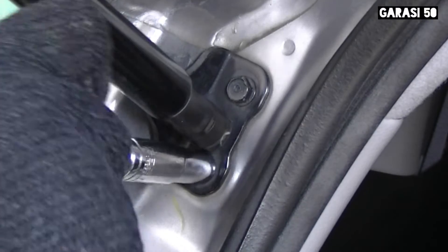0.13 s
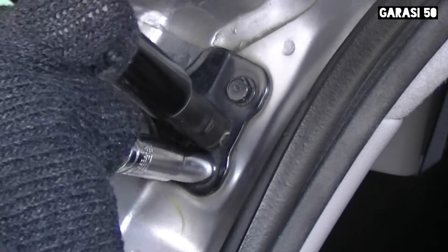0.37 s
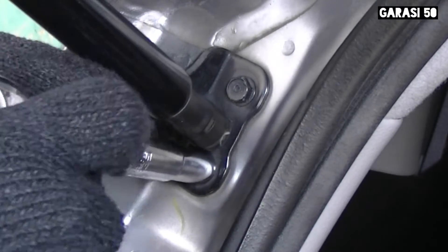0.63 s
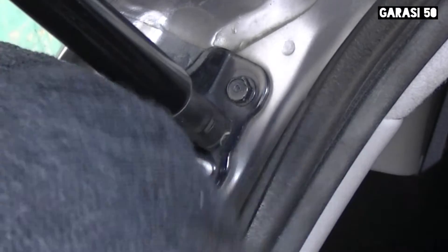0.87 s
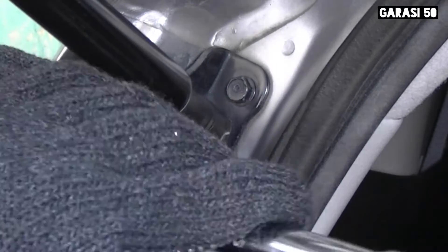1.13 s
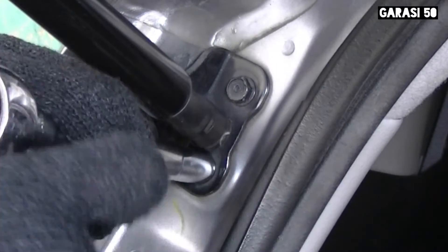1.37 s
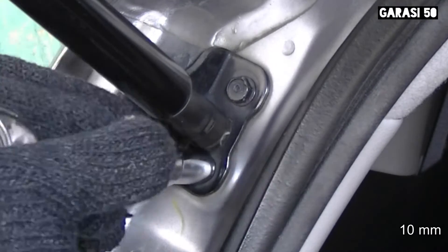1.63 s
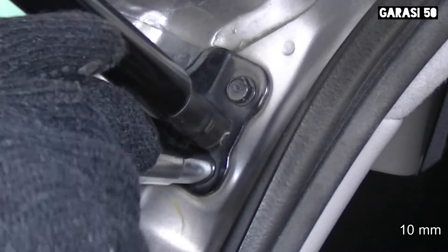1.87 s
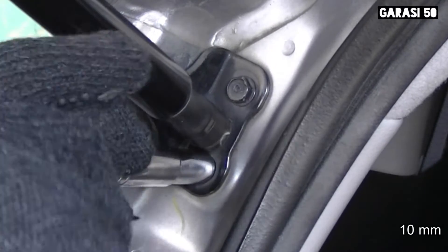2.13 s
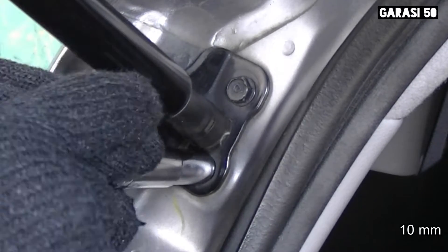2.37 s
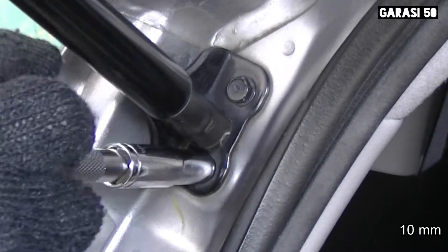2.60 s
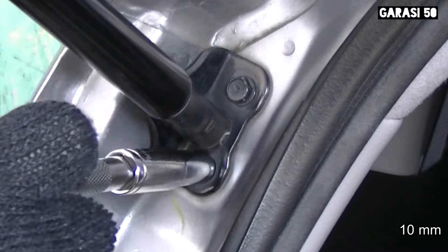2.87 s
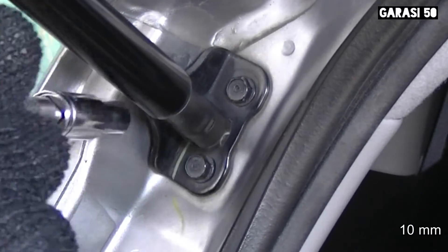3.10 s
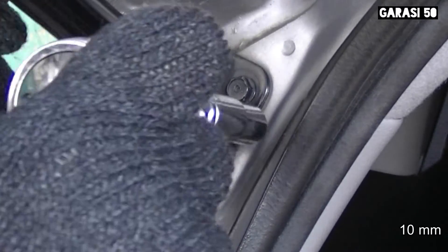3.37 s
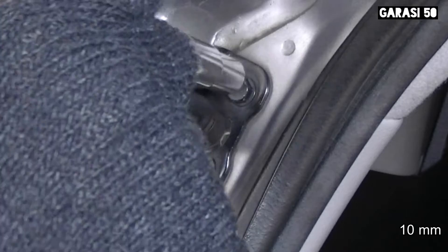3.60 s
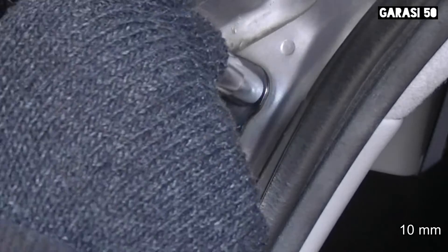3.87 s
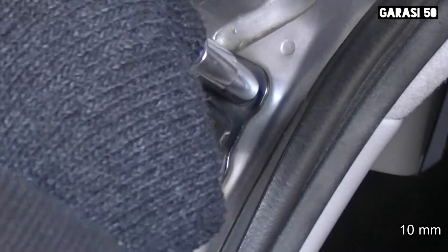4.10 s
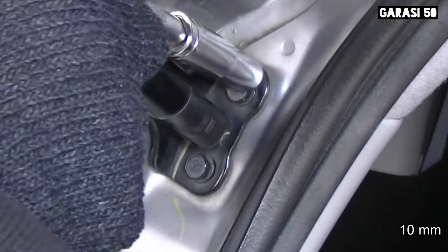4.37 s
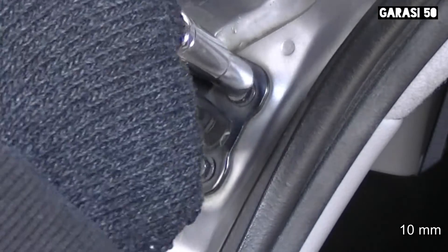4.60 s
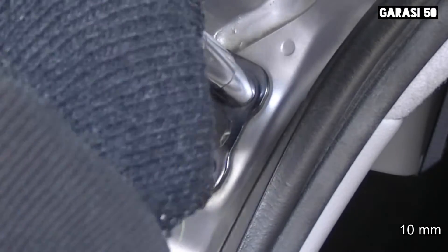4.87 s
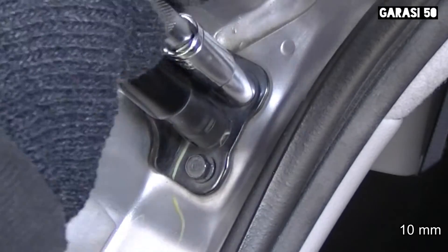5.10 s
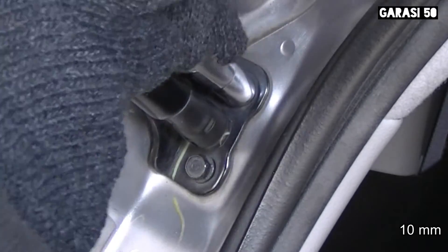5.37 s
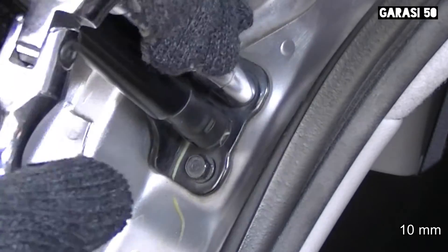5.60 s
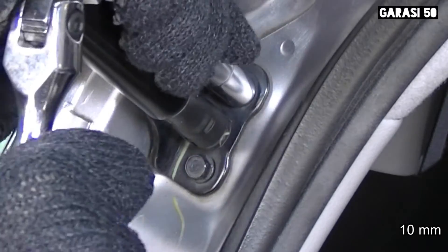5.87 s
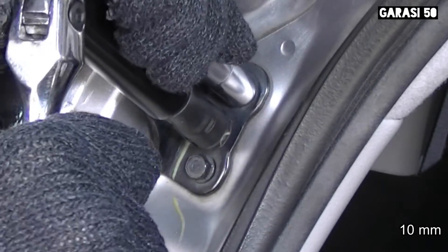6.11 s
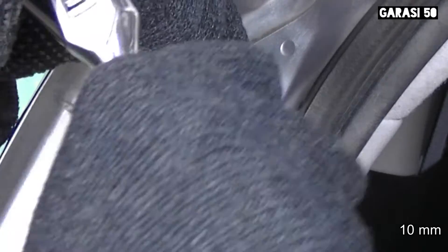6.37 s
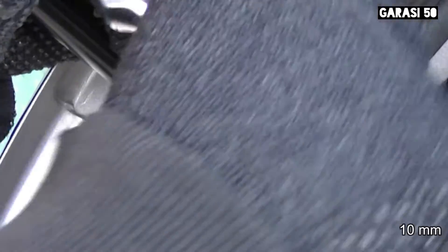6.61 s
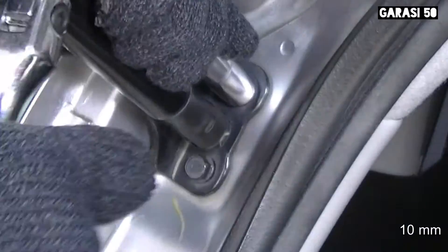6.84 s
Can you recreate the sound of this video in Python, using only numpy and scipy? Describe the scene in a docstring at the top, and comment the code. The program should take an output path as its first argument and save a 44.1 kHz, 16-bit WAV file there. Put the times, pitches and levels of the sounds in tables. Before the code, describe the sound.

Close stereo microphone in an open garage. A hand ratchet gives four quick bursts of bright, dry clicks about a third of a second apart, with small knocks between. Then the socket is moved, clanking hard on the ringing sheet metal of a tailgate, with dull hand bumps. Scattered clicks follow, a lull filled by a rushing background, and one final ratchet burst.

```python
"""Open garage, a stereo microphone close to a car's sheet-metal tailgate.
A hand ratchet with a socket works on bolts: on each back swing the pawl snaps over the teeth and rings the head.
Socket and handle knock and ring the panel; hands bump it; a faint narrow ringing comes and goes.
Blows are short rough contacts driving decaying modes; tailgate and garage answer with a diffuse noise tail.
Behind lie a rush and a low drone, probably traffic: bands of flickering noise that dip and recover."""
import sys
import numpy as np
from scipy import signal
from scipy.io import wavfile

SR = 44100
rng = np.random.default_rng(int(sys.argv[2]) if len(sys.argv) > 2 else 0)


def file_out(sig):
    """Save sig as 16-bit WAV at sys.argv[1]."""
    # one column per channel
    cols = np.atleast_2d(sig).T
    # limit, then scale
    lim = np.clip(cols, -1, 1)
    pcm = np.round(lim * 32767).astype(np.int16)
    wavfile.write(sys.argv[1], SR, pcm)


def ratio(d):
    """dB to gain"""
    e = np.asarray(d, float) / 20
    return 10 ** e


N = 307818   # samples, about 7 s
CONTROL_STEP = 40   # samples between values of a slow curve


def rms_one(x):
    """Scales to rms 1."""
    return x / np.sqrt(np.mean(x ** 2) + 1e-20)


def at_hz(points, hz):
    """Reads a table on a log-frequency axis."""
    f, value = np.array(points).T
    return np.interp(np.log(hz), np.log(f), value)


def in_time(rows):
    """Curve columns at every sample, the first column being t/s."""
    s, *columns = np.transpose(rows)
    return [np.interp(np.arange(N) / SR, s, column) for column in columns]


def band(x, low_hz, high_hz):
    """Second-order band-pass."""
    return signal.sosfilt(signal.butter(2, [low_hz, high_hz], "band", fs=SR, output="sos"), x)


def cut(x, hz, kind):
    """Steep high- or low-pass."""
    return signal.sosfilt(signal.butter(4, hz, kind, fs=SR, output="sos"), x)


def every_sample(slow):
    """Joins the values of a slow curve by straight lines."""
    return np.interp(np.arange(N) / CONTROL_STEP, np.arange(len(slow)), slow)


def drift(rate_hz):
    """Slow chance of spread 1: white noise through two equal one-pole low-passes."""
    r = np.exp(-2 * np.pi * rate_hz * CONTROL_STEP / SR)
    settle = 2000   # values dropped while the filter settles
    white = rng.standard_normal(N // CONTROL_STEP + 2 + settle)
    return rms_one(signal.lfilter([1], [1, -2 * r, r * r], white)[settle:])


def humps(s, top_db, rise_db_per_s, fall_db_per_s):
    """Gain of events that climb to their top and fall away at steady rates; the loudest one counts."""
    t = np.arange(0, N + CONTROL_STEP, CONTROL_STEP) / SR - np.array(s)[:, None]
    db = np.array(top_db)[:, None] + np.minimum(rise_db_per_s * t, -fall_db_per_s * t)
    return every_sample(ratio(db.max(axis=0)))


def contact(length_s, rise_s, alike, snap, size):
    """A contact per event: one clean snap, then rough chatter that rises and dies, partly its own at each mic."""
    t = np.arange(size) / SR
    shape = (1 - np.exp(-t / rise_s)) * np.exp(-t / length_s[:, None])
    mid, side = rng.standard_normal((2, len(length_s), size))
    opposite = side * [[[1]], [[-1]]]   # axes: microphone, event, sample
    chatter = shape * (np.sqrt(1 + alike) * mid + np.sqrt(1 - alike) * opposite)
    chatter = chatter / np.sqrt(np.sum(chatter ** 2, axis=-1, keepdims=True))
    return snap * (t == 0) + chatter


def strike(s, force, level_db, centre_hz, modes, slope_db, lag_cycles=0, pan_db=0):
    """Every event rings all modes, most those near its centre (slope per octave); a lag in cycles delays low modes more."""
    out, steps = np.zeros((2, N)), np.arange(force.shape[-1])
    balance_db = np.array([[.5], [-.5]]) * pan_db   # positive pan is left
    for hz, mode_db, t60 in modes:
        near_db = -slope_db * np.abs(np.log2(hz / centre_hz))
        gain = ratio(level_db + mode_db + near_db + balance_db)
        # chance in the contact colours a blow only mildly
        drive = np.abs(force @ np.exp(-2j * np.pi * hz / SR * steps))
        gain = gain / np.maximum(drive, .3) ** .8
        start = np.round((s + lag_cycles / hz) * SR).astype(int)
        at = np.minimum(start[:, None] + steps, N - 1).ravel()
        push = [np.bincount(at, (g[:, None] * f).ravel(), N) for g, f in zip(gain, force)]
        r, w = ratio(-60 / (t60 * SR)), 2 * np.pi * hz / SR
        out += signal.lfilter([.5, 0, -.5], [1, -2 * r * np.cos(w), r * r], np.add(push, 1e-18))
    return out


# left-right likeness of the background at the microphone pair: f/Hz, likeness (1 same, -1 opposite)
BACKGROUND_LIKENESS = [(60, 0.77), (180, 0.63), (550, 0.79), (1650, 0.18), (4970, -0.98), (15000, 0.046)]


def flickering_noise(spectrum, patchy_db):
    """Near half-octave bands of stereo noise, each with its own level, flicker and likeness; rms 1."""
    low_hz, high_hz = spectrum[0][0], spectrum[-1][0]
    edges = np.geomspace(low_hz, high_hz, round(2.2 * np.log2(high_hz / low_hz)) + 1)
    white = rng.standard_normal((2, 2, N))   # neighbouring bands take different noise
    out, together = 0, drift(11.0)
    for k, (low, high) in enumerate(zip(edges, edges[1:])):
        mid, side = band(white[k % 2], low, high)
        hz = np.sqrt(low * high)
        alike = at_hz(BACKGROUND_LIKENESS, hz)
        flicker_db = patchy_db * (0.46 * together + drift(32.0))
        gain = every_sample(ratio(at_hz(spectrum, hz) + flicker_db))
        pair = np.sqrt(1 + alike) * mid + np.sqrt(1 - alike) * side * [[1], [-1]]
        out = out + gain * pair
    return rms_one(out)


# background rush, probably traffic; it dips around the back swings and recovers:
# t/s, roar level/dB, brightness/dB (hiss over roar)
RUSH = [(0.0, -41.5, 6), (.15, -43.5, 0), (.4, -40, -4.5), (.92, -39, -3), (.98, -45.5, 10.5),
        (1.08, -73, 15), (1.75, -64, 5), (2.05, -69.5, -20), (2.8, -65, -16.5), (3.1, -64, -9.5),
        (3.76, -62, -24), (4.1, -55.5, -31), (4.7, -52.5, -22), (5.2, -51, -0.5), (5.33, -42, -17),
        (5.64, -33.5, -48), (5.8, -32.5, -21.5), (6.3, -35, -11), (6.5, -37, -10.5), (6.66, -35, -4),
        (6.76, -52.5, -2), (6.87, -41, 1.5), (6.98, -31, -7.5)]
# low background drone, probably traffic; it dips and recovers likewise: t/s, level/dB
LOW_DRONE = [(0.0, -40), (.3, -48.5), (.7, -54), (.93, -46), (1.1, -63.5), (2.1, -63.5), (3.3, -78),
             (4.2, -73), (4.65, -80), (5.15, -68), (5.3, -56), (5.72, -48.5), (6.33, -36), (6.5, -42.5),
             (6.65, -45.5), (6.7, -57), (6.78, -69), (6.96, -39)]
# spectral shapes of roar, hiss, rumble and drone: f/Hz, relative level/dB
ROAR_SPECTRUM = [(530, -67), (900, -3.5), (1480, 0.5), (1610, 1.5), (1780, -5.5), (2020, -1.5),
                 (2250, -4.5), (2500, -19), (3500, -46), (4550, -56.5), (7700, -120)]
HISS_SPECTRUM = [(1470, -34), (2500, 9.5), (3060, 1), (4210, -3.5), (8270, -15), (10300, -27.5),
                 (11500, -29.5), (14500, -26), (16000, -38)]
RUMBLE_SPECTRUM = [(15, -67.5), (25, -47.5), (102, -25.5), (193, -15.5), (220, -17), (258, -4.5),
                   (450, -8.5), (580, -24.5), (990, -120)]
DRONE_SPECTRUM = [(240, -38.5), (400, -23), (544, -6), (598, 9), (1000, -21), (1300, -22), (2200, -120)]


def background():
    """A rush of roar and hiss over rumble and drone; swells and bumps add power to the same noise."""
    roar_db, bright_db = in_time(RUSH)
    drone_db, = in_time(LOW_DRONE)
    rumble_db = np.maximum(drone_db - 15.5, -78)   # the rumble never falls below a faint floor
    steady = ratio(np.array([roar_db, roar_db + bright_db, rumble_db, drone_db]))
    brief = np.array([*swells(), *bumps()])   # roar, hiss, rumble, drone
    spectra = [ROAR_SPECTRUM, HISS_SPECTRUM, RUMBLE_SPECTRUM, DRONE_SPECTRUM]
    layers = zip(np.hypot(steady, brief), spectra)
    return sum(gain * flickering_noise(spectrum, patchy_db=1.7) for gain, spectrum in layers)


# hands bumping the panel, close to the microphone: t/s, rumble level/dB, boom level/dB
HAND_BUMPS = [(0.01, -42, -62), (0.741, -61, -39), (.91, -56, -54), (1.22, -60, -47.5), (2.49, -55, -62.5),
              (3.19, -56, -74), (3.87, -70, -65), (4.179, -53, -77), (4.33, -56, -45.5),
              (4.429, -66, -45.5), (4.719, -57, -49), (4.818, -43, -27.5), (4.92, -40, -31.5),
              (6.351, -54, -33), (6.56, -48.5, -48)]


def bumps():
    """Gains of rumble and boom: a hand's bump jumps up and dies in low noise."""
    s, *levels_db = np.transpose(HAND_BUMPS)
    return [humps(s, db, rise_db_per_s=702.5, fall_db_per_s=224.5) for db in levels_db]


# socket and handle on bolt and panel, close: t/s, level/dB, centre f/Hz,
# socket level/dB and crack level/dB (both against the blow)
BLOWS = [(.036, -18, 2020, 7.5, -3), (.734, -17, 970, -13, -19), (.94, -11, 4700, -2.5, -31),
         (1.224, -26, 985, -22, -50), (1.457, -43.5, 1190, -10.5, -19), (1.573, -37, 1100, -13, -15),
         (2.123, -26, 3000, -13, -26), (2.141, -23.5, 2570, -5.5, -37), (2.199, -29.5, 2650, -21, -30),
         (2.215, -33, 1450, -33, -34), (2.418, -28.5, 1440, -50, -20), (2.483, -15.5, 835, -37, -34),
         (2.92, -54.5, 3000, -40, -11), (2.975, -48, 1750, -41, -11), (2.985, -42.5, 1340, -47.5, -32),
         (3.165, -3, 3070, -10.5, -6.5), (3.181, -6.5, 1610, -13.5, -17), (3.273, -28, 1600, -23, -23),
         (3.845, -3.5, 2000, -62, -16.5), (3.856, -15, 1310, -34, -5), (3.985, -18, 1940, -60, -39),
         (4.168, -2.5, 2020, -14, -3.5), (4.238, -44, 1570, -52, -17), (4.259, -20.5, 2110, -35, -13),
         (4.299, -22.5, 2510, -44, -2), (4.329, -40, 710, -33, -6), (4.419, -7.5, 1930, -19, -8),
         (4.474, -13.5, 1800, -19.5, -3), (4.714, -13.5, 770, -25.5, -42), (4.751, -12, 830, -22, -28),
         (4.794, -3.5, 2010, -15, -4), (4.86, -19, 835, -20.5, -14), (4.9, -16.5, 740, -29, -15),
         (4.915, -9, 1960, -29, -13.5), (5.766, -23.5, 1390, -15.5, -28), (6.29, -3.5, 1780, -28, -10.5),
         (6.531, -12.5, 1690, -49, -11), (6.829, -22.5, 2690, -18, -10), (6.885, -19, 1110, -24, -7),
         (6.94, -12.5, 2730, -37.5, -35)]
# panel and bracket modes: f/Hz, relative level/dB
PANEL_MODES = [(330, -15), (490, -9), (610, -5.5), (727, -2.5), (800, -10.5), (900, -5), (1060, -1.5),
               (1170, -3), (1310, -6), (1440, -4), (1600, -1), (1740, -20), (1940, -1.5), (2120, 2),
               (2260, 0.5), (2400, -7), (2670, -0.5), (2830, -0.5), (3020, -11.5), (3180, 1), (3450, -5.5),
               (3850, -9), (4300, -18.5)]
# socket modes: f/Hz, relative level/dB, t60/s
SOCKET_MODES = [(4900, -4, 0.00067), (5920, -5, 0.015), (6940, -9, 0.0088), (8410, -13, 0.0074),
                (9430, 4.5, 0.0035), (12200, -12, 0.0028), (13800, -8.5, .006)]
# the crack of a blow: f/Hz, relative level/dB, t60/s
CRACK_MODES = [(3300, -10, 0.001), (3800, -4, 0.0077)]


def knocks():
    """A blow cracks, sounds the socket at once and spreads into the panel, low modes last."""
    s, level_db, centre_hz, socket_db, crack_db = np.transpose(BLOWS)
    length_s = 0.0046 * (2000 / centre_hz) ** 0.22   # deeper blows touch longer
    force = contact(length_s, rise_s=0.00067, alike=0.36, snap=0.75, size=1600)
    tick = contact(0.6 * length_s, rise_s=0.00016, alike=1.0, snap=0.48, size=800)
    crack = contact(np.full(len(s), 0.0002), rise_s=0.00011, alike=0.44, snap=0.62, size=400)
    modes = [(hz, db, 2.42 / np.sqrt(hz)) for hz, db in PANEL_MODES]   # low modes ring longer
    panel = strike(s, force, level_db - 9.5, centre_hz, modes, slope_db=13.5, lag_cycles=2.9)
    panel += strike(s, crack, level_db + crack_db + 7.0, 3900, CRACK_MODES, slope_db=5.5)
    socket = strike(s, tick, level_db + socket_db, 3700, SOCKET_MODES, slope_db=9.0)
    return cut(cut(panel, 4200, "low"), 7200, "low") + socket


# diffuse tail of tailgate and garage around the microphone: f/Hz, relative level/dB, t60/s
GARAGE_TAIL = [(400, -8.5, 0.56), (1000, -2, 0.24), (2000, -11.5, 0.55), (4000, -10.5, 0.32),
               (8000, -14, 0.32), (12800, -28.5, 0.46)]


def garage(x):
    """So many modes and echoes overlap that each band's energy lingers as noise, unrelated left and right."""
    f, level_db, t60_s = np.transpose(GARAGE_TAIL)
    edges = np.geomspace(300, 16000, 16)
    white = rng.standard_normal((2, 2, N))
    out, mono = 0, x.mean(axis=0)
    fill = np.exp(-1 / (0.0013 * SR))   # the tail builds up over 1.3 ms
    for k, (low, high) in enumerate(zip(edges, edges[1:])):
        hz = np.sqrt(low * high)
        fade = ratio(-120 / (at_hz(np.column_stack([f, t60_s]), hz) * SR))   # of energy, per sample
        power = band(mono, low, high) ** 2 + 1e-18
        energy = signal.lfilter([1 - fill], np.convolve([1, -fade], [1, -fill]), power)
        noise = band(band(white[k % 2], low, high), low, high)
        envelope = np.sqrt(np.abs(energy) * SR / 2 / (high - low))   # evens out the bandwidth
        out = out + ratio(at_hz(np.column_stack([f, level_db]), hz) - 28.5) * envelope * noise
    return out


# single pawl snaps as the handle creeps: t/s, high ring level/dB, low ring level/dB, low ring f/Hz
CREEP_SNAPS = [(.1545, -55, -40.5, 5160), (0.9114, -50, -34.5, 5300), (1.0666, -57.5, -31.5, 4630),
               (1.3798, -54, -39.5, 5500), (1.4576, -55.5, -45, 5280), (1.7006, -35.5, -36.5, 5240),
               (1.7205, -52, -36.5, 5200), (1.7449, -53, -46, 6700), (1.9185, -67, -36, 5500),
               (2.371, -29, -27, 3930), (2.3882, -19, -23, 4400), (2.5205, -19.5, -26.5, 4800),
               (2.628, -39.5, -54, 3100), (3.0614, -75, -59, 6100), (3.133, -70.5, -67.5, 6300),
               (4.948, -17, -22, 4900), (4.9667, -22.5, -18.5, 3400), (4.9975, -27, -19.5, 4400),
               (5.0585, -22.5, -21, 5900), (5.0843, -26.5, -23.5, 4900), (5.1214, -23.5, -22, 6060),
               (6.6407, -45.5, -40.5, 3300), (6.8802, -47, -40, 4100)]
# back swings of the handle, a list each: t/s, teeth passed, high ring level/dB, high ring f/Hz, low ring f/Hz
BACK_SWINGS = [
    [(.9192, 0, -21, 11700, 5600), (.9348, 1, -22, 11300, 5300), (.9562, 5, -18, 10800, 5100),
     (.9969, 13, -24, 12000, 5300), (1.0057, 14, -25, 12000, 5600), (1.0209, 15, -26, 12100, 5300)],
    [(1.2503, 0, -18, 11100, 4500), (1.2624, 2, -20, 11100, 4600), (1.2706, 3, -20, 11000, 6000),
     (1.2916, 7, -21, 11400, 5400), (1.3182, 12, -24, 12000, 6700), (1.3255, 13, -21, 12100, 6900)],
    [(1.5892, 0, -18, 11200, 6200), (1.6133, 4, -19, 11300, 6300), (1.6297, 7, -20, 11200, 6100),
     (1.6588, 13, -23, 11800, 6800)],
    [(1.9378, 0, -21, 10800, 6200), (1.9509, 1, -18, 10800, 5800), (1.9827, 4, -21, 11500, 6600),
     (1.9974, 5, -19, 11600, 6300), (2.0094, 6, -20, 11600, 6400), (2.0288, 8, -24, 11600, 5600)],
    [(6.6626, 0, -19, 11700, 3200), (6.6744, 1, -20, 11700, 3100), (6.7098, 5, -18, 11700, 3200),
     (6.735, 8, -18, 11700, 4400), (6.7566, 10, -24, 11700, 5800), (6.7699, 11, -26, 12000, 5900)],
]
# low ring over each back swing, a row each: level/dB at the first tooth, level/dB at the last
SWING_LOW_RING = [(-23.5, -24), (-22, -24), (-28.5, -24.5), (-23.5, -29.5), (-19, -29)]


def snaps():
    """Rows (s, high dB, high Hz, low dB, low Hz, pan dB) of all pawl snaps; no two teeth of a swing are quite alike."""
    pan_start_db, pan_end_db = 1, 2   # the head moves left as the handle swings
    spread_db, spread_hz = 1.2, 350   # from tooth to tooth
    rows = [(s, high_db, 10850, low_db, low_hz, pan_start_db)
            for s, high_db, low_db, low_hz in CREEP_SNAPS]
    for swing, (first_db, last_db) in zip(BACK_SWINGS, SWING_LOW_RING):
        s, teeth, high_db, high_hz, low_hz = np.transpose(swing)
        tooth = np.arange(teeth[-1] + 1)   # a snap at every whole tooth
        s, high_db, high_hz, low_hz = [np.interp(tooth, teeth, c) for c in (s, high_db, high_hz, low_hz)]
        through = tooth / tooth[-1]
        high_chance, low_chance, hz_chance, pan_chance = rng.standard_normal((4, len(tooth)))
        high_db = high_db + spread_db * high_chance
        low_db = first_db + (last_db - first_db) * through + spread_db * low_chance
        low_hz = low_hz + spread_hz * hz_chance
        pan_db = pan_start_db + (pan_end_db - pan_start_db) * through + pan_chance
        rows += zip(s, high_db, high_hz, low_db, low_hz, pan_db)
    return np.transpose(rows)


# ratchet head modes, high group: f/Hz, relative level/dB, t60/s
HEAD_HIGH_MODES = [(9600, -4, 0.0059), (10900, 0, .013), (11006, -2, 0.015), (11380, -0.5, .012),
                   (11270, -1.5, 0.016), (11640, -0.5, .012), (13400, -9, 0.004), (13100, -14.5, 0.004),
                   (14400, -5, .005)]
# ratchet head modes, low group: f/Hz, relative level/dB, t60/s
HEAD_LOW_MODES = [(2338, -10.5, 0.0027), (2750, 14, 0.0045), (3720, -6.5, 0.0047), (4288, 5, 0.0064),
                  (4930, -7, 0.012), (5500, -1.5, 0.0055), (6580, 7.5, 0.0026), (7545, 3, 0.012),
                  (8500, -0.5, 0.023)]


def ratchet():
    """The pawl lands, bounces once more weakly, and rings the steel head."""
    s, high_db, high_hz, low_db, low_hz, pan_db = snaps()
    force = contact(np.full(len(s), .0008), rise_s=0.0005, alike=0.61, snap=.15, size=400)
    force = force + ratio(-10) * np.roll(force, round(.0039 * SR), axis=-1)   # the bounce, 3.9 ms on
    high = strike(s, force, high_db + 1.0, high_hz, HEAD_HIGH_MODES, slope_db=95, pan_db=pan_db)
    low = strike(s, force, low_db + 0.5, low_hz, HEAD_LOW_MODES, slope_db=15.0, pan_db=pan_db)
    return cut(high + low, 3000, "high")   # the small head has no deep modes


# brief swells of the background rush, many just before or during a back swing:
# t/s, level/dB, brightness/dB (hiss over roar)
RUSH_SWELLS = [(1.266, -42, -3.5), (1.556, -47, -16), (1.956, -44.5, -26), (2.196, -51, -35),
               (2.34, -48, -40), (2.479, -45.5, -44), (2.66, -54, -43), (4.04, -51, -35.5),
               (4.24, -48, -55), (4.34, -51.5, -14), (4.53, -41.5, -14), (4.772, -43.5, -21.5),
               (4.951, -33, -12), (6.532, -39, -4.5)]


def swells():
    """Gains of roar and hiss: the background rush climbs and falls away at steady rates."""
    s, roar_db, bright_db = np.transpose(RUSH_SWELLS)
    levels_db = (roar_db, roar_db + bright_db)
    return [humps(s, db, rise_db_per_s=115, fall_db_per_s=167) for db in levels_db]


# faint narrow ringing while the socket is shifted: t/s of the top, low tone level/dB, high tone level/dB
SHIFT_RINGING = [(2.22, -51, -68.5), (2.42, -48, -73), (2.6, -50, -74), (2.64, -55, -63), (2.76, -67, -69),
                 (3.14, -61, -87), (3.3, -52.5, -60.5), (3.37, -50.5, -71), (3.44, -62, -76)]
# its two tones, low and high: f/Hz, width/Hz
SHIFT_TONES = [(1330, 87), (2750, 90)]


def ringing():
    """Friction noise through two narrow resonances, the same at both microphones."""
    s, *levels_db = np.transpose(SHIFT_RINGING)
    out = 0
    for db, (hz, width_hz) in zip(levels_db, SHIFT_TONES):
        tone = rms_one(band(rng.standard_normal(N), hz - width_hz / 2, hz + width_hz / 2))
        out = out + tone * humps(s, db, rise_db_per_s=400, fall_db_per_s=139.5)
    return out


def scene():
    """The tool and its echo over the background; small steel parts radiate little bass."""
    tool = cut(ratchet() + knocks(), 270, "high") + ringing()
    return tool + garage(tool) + background()


def top_cut(x):
    """Nothing passes above the cut-off."""
    return signal.sosfilt(signal.butter(12, 16500, fs=SR, output="sos"), x)


def record(dry):
    """Sound reaches the right microphone one sample later; the top is cut twice over at 15.3 kHz."""
    pair = np.array([dry[0], np.roll(dry[1], 1)])
    mix = cut(cut(pair, 15300, "low"), 15300, "low")
    return top_cut(mix)


dry = scene()
out = record(dry)
file_out(out)
```